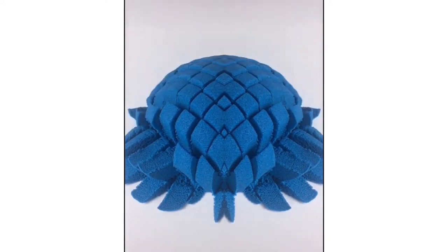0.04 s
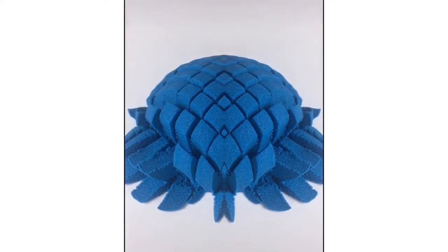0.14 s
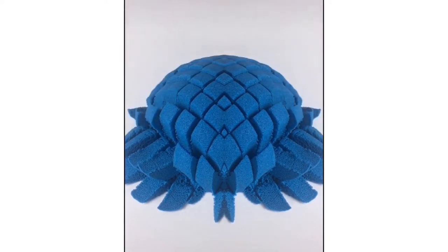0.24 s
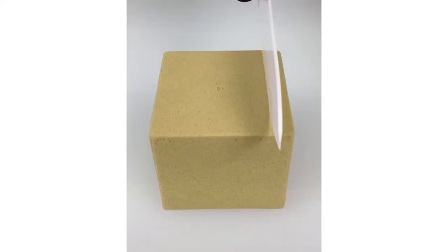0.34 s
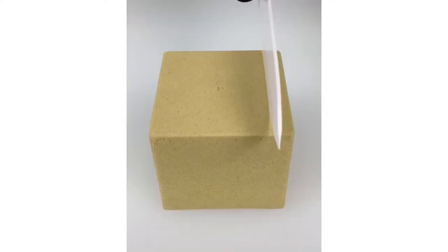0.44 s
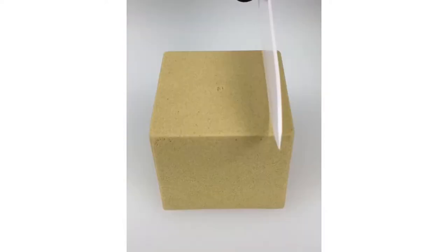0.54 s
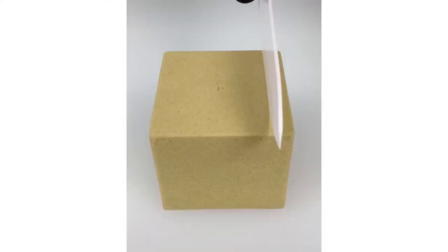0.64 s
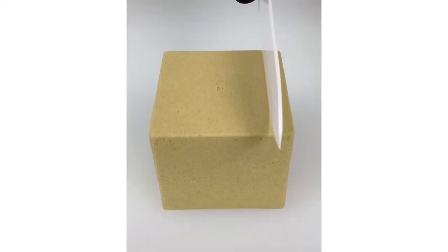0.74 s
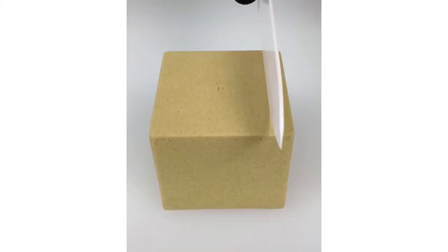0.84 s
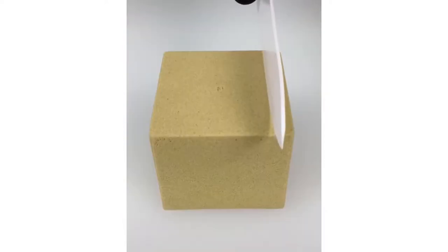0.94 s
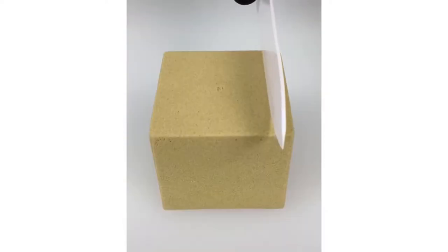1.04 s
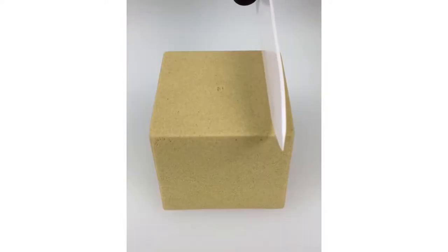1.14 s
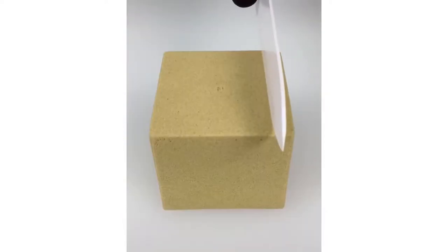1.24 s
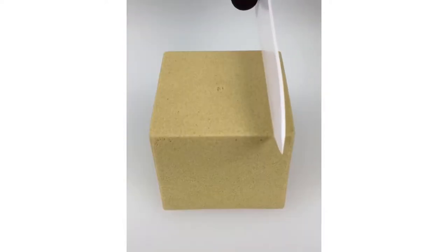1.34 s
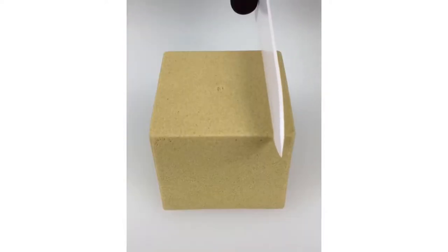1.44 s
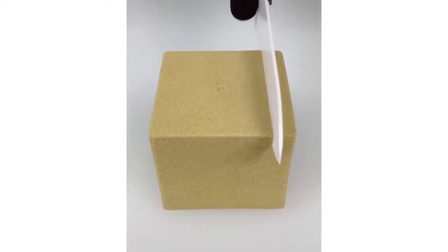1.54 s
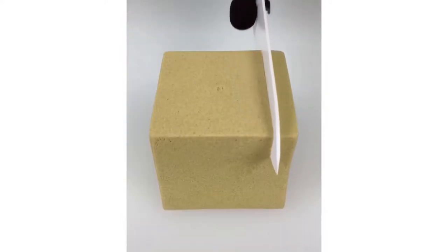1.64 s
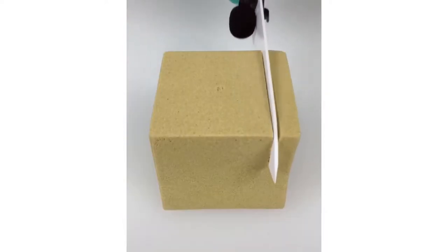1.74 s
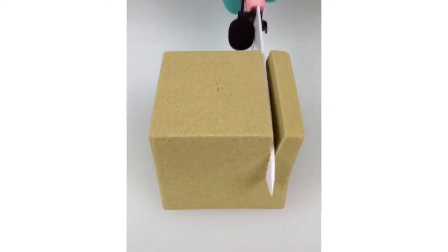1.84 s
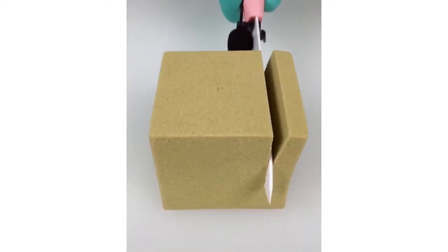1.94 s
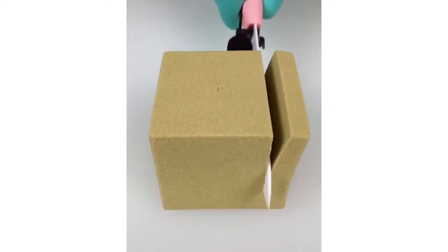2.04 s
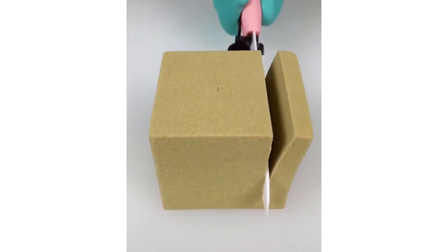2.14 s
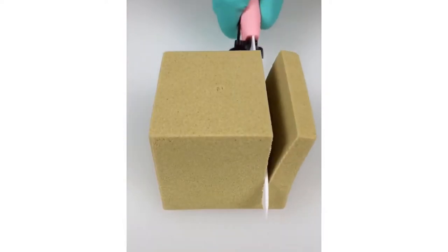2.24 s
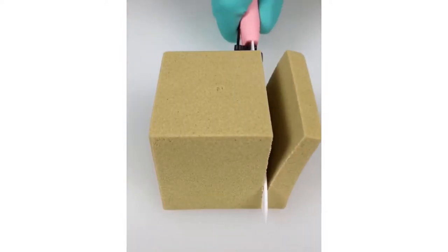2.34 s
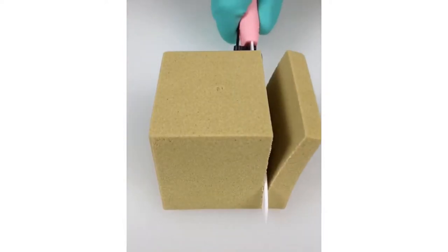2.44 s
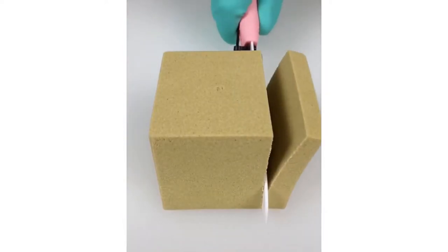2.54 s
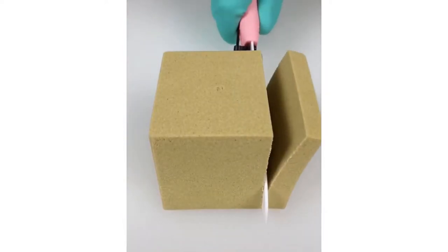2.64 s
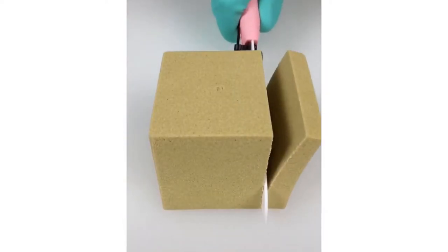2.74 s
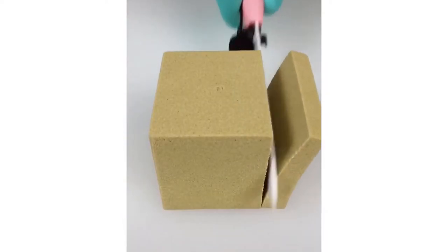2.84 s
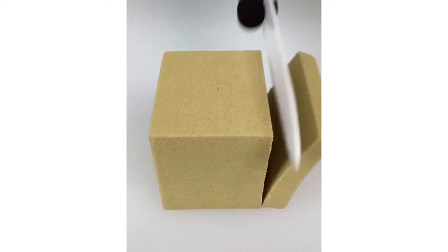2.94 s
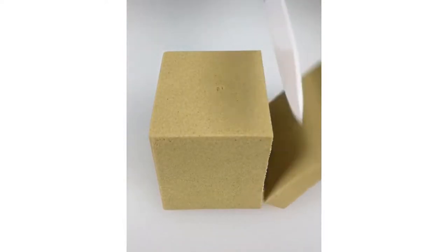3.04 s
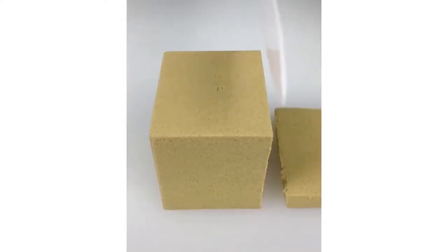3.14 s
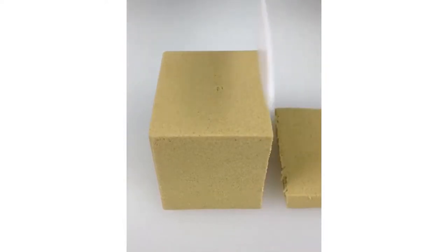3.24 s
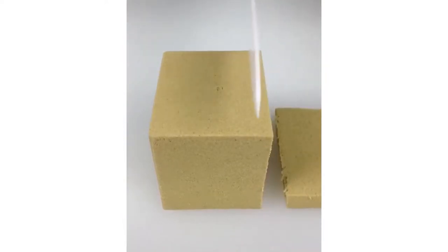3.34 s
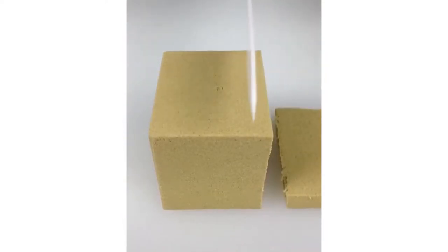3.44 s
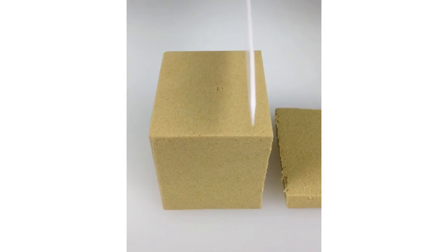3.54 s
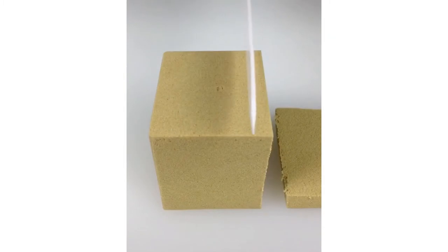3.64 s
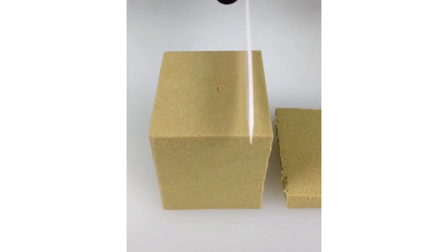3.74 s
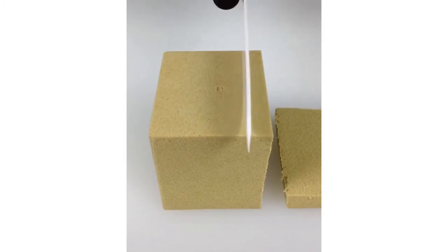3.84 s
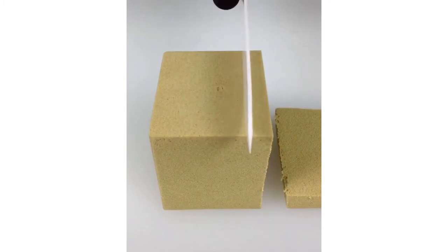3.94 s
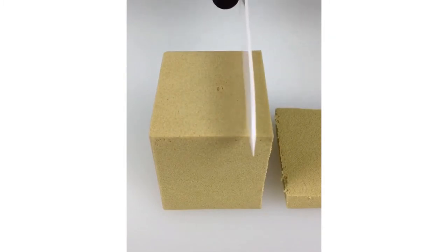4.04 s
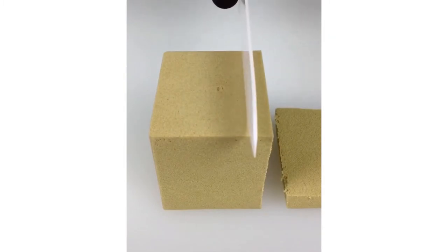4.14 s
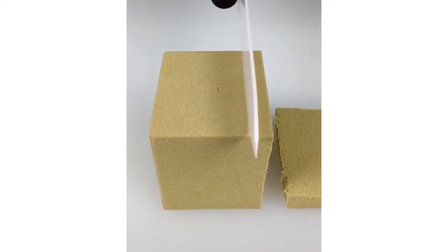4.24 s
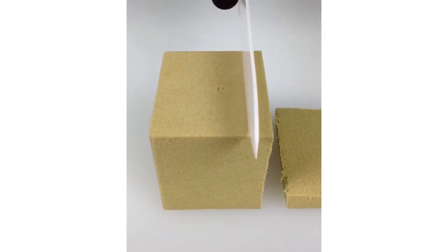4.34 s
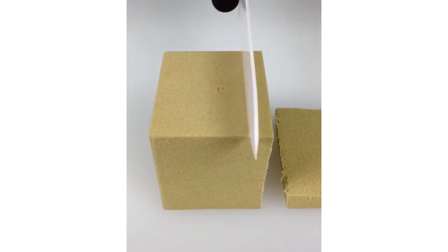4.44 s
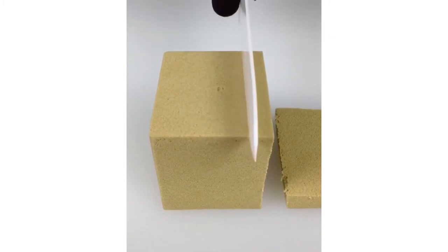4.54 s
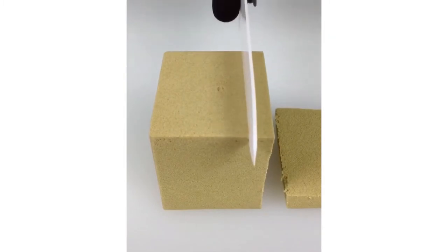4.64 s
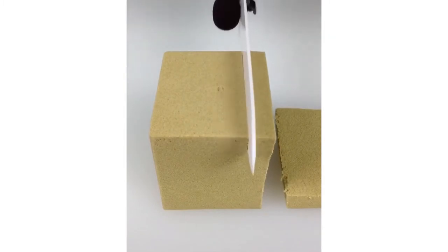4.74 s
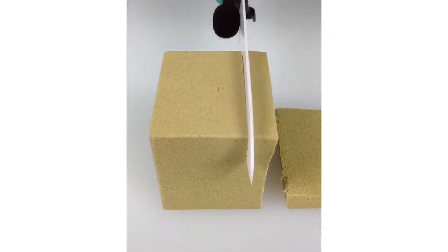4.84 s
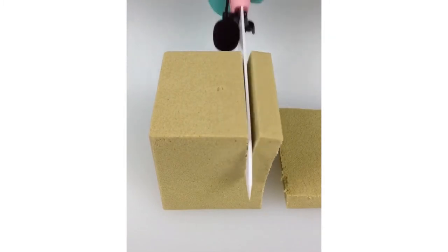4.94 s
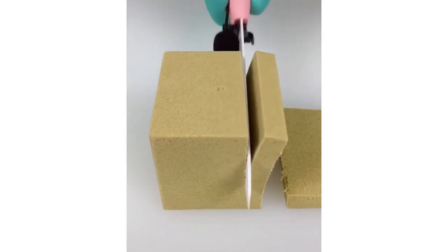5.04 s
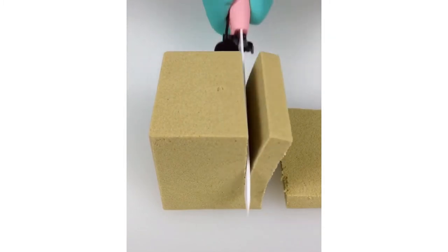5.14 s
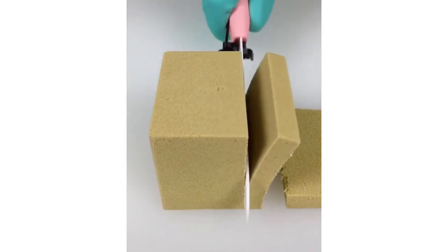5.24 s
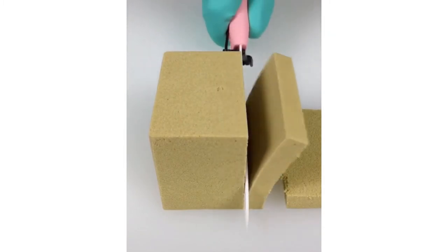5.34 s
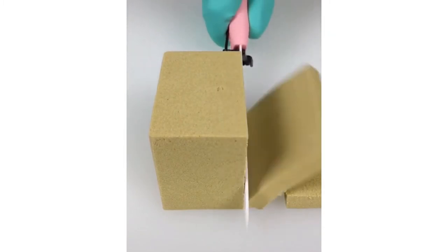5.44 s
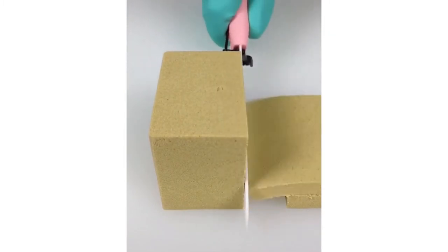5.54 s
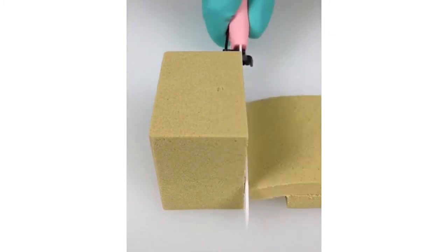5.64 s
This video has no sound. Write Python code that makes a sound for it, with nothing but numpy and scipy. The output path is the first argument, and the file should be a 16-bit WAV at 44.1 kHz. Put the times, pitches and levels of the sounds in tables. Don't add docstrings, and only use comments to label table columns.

```python
import sys
import numpy as np
from scipy import signal
from scipy.io import wavfile
from scipy.ndimage import uniform_filter1d

SR = 44100
rng = np.random.default_rng(int(sys.argv[2]) if len(sys.argv) > 2 else 0)


def amplitude_ratio(level_db):
    exponent = np.asarray(level_db, float) / 20
    return 10 ** exponent


def pcm_store(signal):
    levels = np.round(np.clip(np.atleast_2d(signal), -1, 1) * 32767)
    wavfile.write(sys.argv[1], SR, levels.astype(np.int16).T)


N = 250488

# f/Hz, level/dB per Hz
HISS_TONE = [(60, -9), (150, 2.5), (400, -0.5), (1000, -10), (4000, -14), (15400, -19)]
HISS_DB = -73.5
# f/Hz, level/dB per Hz
SWAY_TONE = [(3, 0), (20, 6.5), (40, -6), (80, -21), (140, -34.5), (300, -69)]
# t/s, level/dB
KICKS = [
    (.45, -55),
    (.97, -51),
    (2.4, -32.5),
    (2.86, -51.5),
    (3.24, -36),
    (3.95, -48),
    (4.7, -53),
    (5.43, -40),
    (5.68, -35),
]
SWAY_DB, SWAY_RISE, SWAY_FALL = -56.5, 220, 65

# t/s, peak level/dB
BITES = [(0.4277, -37.5), (0.4783, -33), (.5003, -44), (0.595, -45), (.634, -45.5), (.6699, -43),
         (0.7613, -34.5), (0.8646, -27), (.8764, -36), (0.9567, -33), (0.9714, -32), (3.923, -19.5),
         (3.937, -41), (3.9689, -41), (4.0322, -33), (4.0743, -38), (4.1144, -31.5), (4.145, -32),
         (4.2208, -33), (4.2697, -27.5), (4.2774, -25.5)]
# t/s, peak level/dB
CREAKS = [(0.7477, -33.5), (0.837, -31), (0.8759, -31), (0.899, -35), (0.92, -30.5), (0.9405, -29),
          (0.9585, -25), (0.974, -31), (0.986, -25), (1.0079, -27), (1.021, -23)]
# t/s, peak level/dB, relative dull level/dB, length/ms
REBOUNDS = [
    (2.3837, -3.5, -29, 1.8),
    (2.3862, -1, 0.5, 0.87),
    (2.3914, -3, -23, 0.37),
    (2.3935, -9, -33, 0.42),
    (2.397, -26, -23.5, 2.04),
    (5.43, 6, -8, 1.7),
    (5.4308, 9.5, -14.5, 0.44),
    (5.4387, 2.5, -10.5, 0.84),
    (5.4646, 1, -13, 0.91),
]
# t/s, peak level/dB, relative dull level/dB
PINCHES = [(2.4209, -22, -7), (2.4355, -25, -11.5), (2.4464, -50, -8), (2.4663, -26, -20.5),
           (2.4791, -7.5, -19), (2.4904, -40, -16), (2.5207, -14.5, -16), (2.5481, -18, 0),
           (2.5694, -45, -8), (2.5764, -36, -14), (2.616, -44.5, -16), (2.7493, -36, -7),
           (2.7754, -25.5, -20.5), (2.8055, -46.5, -20), (2.8619, -26, -12.5), (5.4599, -30, -15),
           (5.5443, -20, -24), (5.5645, -12, -11), (5.575, -26, 0), (5.6431, -53, -5), (5.656, -41, -30)]
LAG, RISE = .0009, .00015
GRAIN_MS, PINCH_MS = 1.7, 1
DULL_DB, DULL_SLOPE = -17, -0.16
# f/Hz, level/dB per Hz
CREAK_TONE = [(500, -20.5), (950, -4), (2300, -1.5), (4500, -4), (6500, -17), (10000, -31)]
# f/Hz, width/Hz, level/dB
CREAK_RING = [(1010, 650, 11), (2340, 450, 3.5), (4540, 400, 7)]

# t/s, length/s, level/dB, swell/dB, relative dull level/dB
SCRAPES = [(0.433, 0.027, -61, -17, 10), (.473, 0.081, -57.5, -4.5, 7), (2.398, .008, -33, -14, -8),
           (2.409, 0.16, -50.5, -7, -8), (2.583, 0.16, -76.5, 4, 0.5), (2.741, 0.07, -56.5, -7, 4),
           (2.807, 0.063, -67, 14.5, 3.5), (2.872, 0.05, -47, 7, 0.5), (3.927, 0.011, -41, -14, 4.5),
           (5.4415, 0.022, -29.5, -29, -2), (5.474, 0.095, -58, -1.5, 23), (5.636, 0.03, -58.5, 1, 8)]
# t/s, length/s, level/dB, swell/dB, relative dull level/dB
RUBS = [
    (.57, 0.091, -82.5, 18, 6.5),
    (.68, 0.11, -65, .1, -5),
    (3.96, 0.11, -56.5, 0.7, 0.5),
    (4.075, 0.036, -46.5, -1.5, -3.5),
    (4.12, 0.087, -51, -5.5, -5.5),
    (5.57, .04, -41.5, 3.5, -0.5),
]
SCRAPE_RISE, SCRAPE_FALL = 3500, 2400
# f/Hz, level/dB per Hz
FREE_BASE = [(1500, -30.5), (2700, -4), (6000, -2.5), (12000, -0.5), (15400, -5)]
# f/Hz, width/Hz, level/dB
FREE_MODES = [(3530, 35, 5.5), (4112, 180, 13.5), (5800, 100, 7), (6570, 90, 17), (6930, 190, 4.5),
              (7470, 75, 10.5), (9240, 620, 6.5), (10030, 110, 2.5), (10700, 350, 7.5), (11850, 640, 12),
              (14600, 370, 6)]
# f/Hz, width/Hz, level/dB
FREE_FLEX = [(1010, 200, 25), (1680, 70, 9), (1990, 80, 16), (2400, 200, 17)]
# f/Hz, level/dB per Hz
RUMBLE = [(35, -15), (70, -2), (120, 1.5), (200, -10.5), (350, -27.5), (600, -57.5)]
RUMBLE_BEND_DB, RUMBLE_RUB_DB = -8, -0.5

# t/s, level/dB
SLUMP = [(.655, -75), (.67, -45), (.682, -55), (.695, -40), (.725, -42.5), (.745, -44.5), (.76, -64)]
# f/Hz, level/dB per Hz
SLUMP_TONE = [(35, -22), (60, -3), (283, -14), (370, -13.5), (839, -17), (1000, -20), (1200, -27),
              (2180, -15.5), (12000, -39.5), (15600, -58), (22000, -120)]

# t/s, peak level/dB, first f/Hz, last f/Hz, first swing (out +, in -)
BUMPS = [
    (.6725, -24.5, 181, 110, 0.7),
    (.866, -43, 150, 90, 1),
    (2.861, -45, 300, 149, 0.66),
    (3.925, -20.5, 150, 91.6, 1),
]
LANDINGS = [
    (2.3871, 4.5, 400, 1205, 0.98),
]
TOPPLE = [
    (3.225, -4.5, 1090, 812, 0.83),
]
SLAMS = [
    (5.4322, 4.5, 640, 1340, -1.06),
]
FLOPS = [
    (5.6045, -19, 410, 90, 0.74),
]
# f/Hz, level/dB, t60/s
TABLE_MODES = [(362.3, -27.5, 0.12), (696, -17, 0.041), (1363, -12.5, 0.014), (1446, -26, 0.047),
               (1890, -15, 0.023), (2400, -35, .07)]
# f/Hz, level/dB
TABLE_ECHO = [(30, -5.5), (150, -9), (700, -6), (1350, -7.5), (2200, -11.5), (3100, -25), (4200, -23),
              (6500, -35.5), (12000, -44)]
# f/Hz, t60/s
ROOM_DECAY = [(60, 0.77), (120, 0.8), (300, 0.89), (1000, 0.61), (3000, 0.55), (8000, 0.34)]

# t/s, level/dB, half width/s
PUFFS = [
    (0.715, -26.5, 0.022),
    (2.397, -17, 0.0099),
    (2.904, -28.5, 0.068),
    (3.06, -53, 0.071),
    (3.33, -35.5, 0.044),
]

# t/s, grit level/dB
CUTS = [
    [(.77, -54.5), (1.2, -39), (1.55, -34.5), (1.686, -29), (1.75, -33.5), (1.86, -29), (2.17, -32),
     (2.33, -35.5), (2.369, -33)],
    [(4.2, -58.5), (4.32, -46), (4.47, -37), (4.86, -31.5), (5.034, -26.5), (5.104, -30.5), (5.236, -30),
     (5.37, -31), (5.415, -31)],
]
PLUNGE_S, PLUNGE_DB = .017, 10.5
CRUSH_TOP_DB, CRUSH_DEEP_DB, FLEX_DB = -11, -7, -8
# t/s, extra level/dB
LURCHES = [
    (.845, -3),
    (0.879, 8.5),
    (.93, -0.5),
    (0.971, 7.5),
    (1.186, 0.5),
    (1.22, -6),
    (1.242, 2),
    (4.284, -2),
    (4.316, 1.5),
    (4.887, -2.5),
]
LURCH_S = 0.01
# f/Hz, level/dB per Hz
GRIT = [(1590, -48.5), (2700, -13.5), (4090, -7.5), (5430, -8.5), (6710, -2.5), (10400, -4.5),
        (11800, -0.5), (15400, -11.5)]
# f/Hz, width/Hz, level over the grit/dB
BLADE = [(3283, 20, 6), (4234, 270, 7), (5515, 38, -3.5), (5870, 210, -5), (6626, 100, 8), (7560, 48, -3.5),
         (9500, 96, 1), (9700, 130, 4.5), (11380, 180, 3), (12760, 670, 2.5), (14300, 460, -6)]
# f/Hz, level/dB per Hz
FLEX_BASE = [(400, -30.5), (750, 3), (1300, -1.5), (2700, -2.5), (4000, -26)]
# f/Hz, width/Hz, level/dB
FLEX = [(1022, 160, 16), (1720, 450, 4.5), (1976, 100, 7), (2340, 180, 11.5)]
# f/Hz, level/dB per Hz
CRUSH = [(35, -30), (60, 0), (179, 4), (268, -1.5), (359, -1.5), (465, -5), (702, -4.5), (800, -3.5),
         (1040, -35.5), (1760, -120)]
CRUST_AT = [
    1,
    4.36,
]
CRUST_S, CRUST_PER_S, CRUST_DB = 0.2, 220, -37

# f/Hz, level/dB, t60/s
BOOM = [(30, -21.5, 0.19), (50.3, -33.5, 0.99), (109, -30, 0.67), (255, -22.5, 0.12), (357, -38, 0.27),
        (508, -37.5, 0.6)]
# f/Hz, level/dB
SLAB_ECHO = [(30, -8.5), (250, -7.5), (600, -4.5), (1500, -17), (3000, -28), (5500, -34.5), (8000, -42.5),
             (14000, -71)]
SLAB_DB = -4.5


def evened(x):
    return x / np.sqrt(np.mean(x ** 2) + 1e-20)


def read(points, hz):
    f, value = np.transpose(points)
    return np.interp(np.log(hz + 1), np.log(f + 1), value)


def add(mix, s, sound):
    part = mix[round(s * SR):][:len(sound)]
    part += sound[:len(part)]


def colour(x, points, peaks=(), size=8192):
    hz = abs(np.fft.fftfreq(size, 1 / SR))
    power = amplitude_ratio(read(points, hz)) ** 2
    for f, width, db in peaks:
        power = power * (1 + amplitude_ratio(db) ** 2 / (1 + (2 * (hz - f) / width) ** 2))
    log_gain = np.log(power + 1e-10) / 2
    phase = -signal.hilbert(log_gain).imag
    taps = np.fft.ifft(np.exp(log_gain + 1j * phase)).real[:size // 2]
    return signal.oaconvolve(x, taps / np.linalg.norm(taps))[:len(x)]


def level_curve(rows):
    s, db = np.transpose(rows)
    return np.interp(np.arange(N) / SR, s, db)


def window(rows, fade=.002):
    t = np.arange(N) / SR
    inside = np.minimum(t - rows[0][0], rows[-1][0] - t)
    return np.clip(inside / fade + 1, 0, 1)


def sway():
    t = np.arange(N) / SR
    kicks = [db + SWAY_RISE * np.minimum(t - s, 0) - SWAY_FALL * np.maximum(t - s, 0) for s, db in KICKS]
    return np.hypot(amplitude_ratio(SWAY_DB), amplitude_ratio(np.max(kicks, axis=0)))


def floor():
    hiss = amplitude_ratio(HISS_DB) * colour(rng.standard_normal(N), HISS_TONE)
    return hiss + sway() * colour(rng.standard_normal(N), SWAY_TONE, size=32768)


def ticks():
    bright, dull, t = np.zeros(N), np.zeros(N), np.arange(600) / SR
    rows = list(REBOUNDS)
    rows += [(s, db, DULL_DB + DULL_SLOPE * (db + 36), GRAIN_MS) for s, db in BITES]
    rows += [(*row, PINCH_MS) for row in PINCHES]
    rows += [(s, db - 12.5, 15, .3) for s, db in CREAKS]
    for s, db, dull_db, ms in rows:
        noise = rng.standard_normal(600)
        shape = np.exp(-1000 * t / max(ms, .1)) * np.minimum(t / RISE, 1)
        same_energy = np.linalg.norm(shape) / np.linalg.norm(shape * noise)
        burst = amplitude_ratio(db - 8.0) * shape * noise * same_energy
        add(bright, s + LAG, burst)
        add(dull, s + LAG, amplitude_ratio(dull_db + 6.5) * burst)
    return bright, dull


def stroke(levels, grains_per_s=14000, coarse_db=0.0, judder_db=0.5):
    hit = rng.random(N) < grains_per_s / SR
    grain_db = coarse_db * np.minimum(rng.exponential(1, N), 5)
    cracks = evened(hit * rng.standard_normal(N) * amplitude_ratio(grain_db))
    judder = amplitude_ratio(judder_db * evened(signal.lfilter([1], [1, -.995], rng.standard_normal(N))))
    crush = 0.55 * cracks + 0.89 * rng.standard_normal(N)
    return [judder * level * drive for level, drive in zip(levels, (cracks, crush, cracks))]


def scrapes():
    t, power = np.arange(N) / SR, np.zeros((3, N))
    for table, rub_db, bend_db in (SCRAPES, -17, -7), (RUBS, -6.5, -7):
        for s, length, db, swell_db, dull_db in table:
            edges = SCRAPE_RISE * np.minimum(t - s, 0) - SCRAPE_FALL * np.maximum(t - s - length, 0)
            swell = swell_db * np.clip((t - s) / length, 0, 1)
            shares = amplitude_ratio([[0], [dull_db + rub_db], [dull_db + bend_db]])
            power += (amplitude_ratio(db + swell + edges) * shares) ** 2
    return np.sqrt(power)


def slump(lumpy_db=4.0):
    lumps = evened(uniform_filter1d(rng.standard_normal(N), 150))
    level = window(SLUMP) * amplitude_ratio(level_curve(SLUMP) + 1.5 + lumpy_db * lumps)
    return colour(level * rng.standard_normal(N), SLUMP_TONE)


def knocks():
    dry, feed, t = np.zeros(N), np.zeros(N), np.arange(6000) / SR
    table = sum(amplitude_ratio(db - 60 * t / t60) * np.sin(2 * np.pi * hz * t) for hz, db, t60 in TABLE_MODES)
    edge = (1 - t / .00008) * np.exp(-t / .00008)
    push = amplitude_ratio(-14) * t / 0.0044 * np.exp(-t / 0.00069)
    # rows, t60 s, sharp edge dB, table ring dB, room dB
    kinds = [(LANDINGS, .017, -14, -6.5, -3), (SLAMS, 0.01, -18, .5, -2.5), (BUMPS, 0.037, -33, -34, -23),
             (FLOPS, 0.026, -38, -25, 1.6), (TOPPLE, 0.0087, -41.5, -6, -55)]
    for rows, t60, edge_db, ring_db, room_db in kinds:
        for s, db, first_hz, last_hz, sign in rows:
            hz = last_hz + (first_hz - last_hz) * np.exp(-t / 0.0025)
            blow = amplitude_ratio(-60 * t / t60) * np.sin(2 * np.pi * np.cumsum(hz) / SR)
            swing = sign * (blow + amplitude_ratio(ring_db) * table)
            add(dry, s, amplitude_ratio(db) * (swing + amplitude_ratio(edge_db) * edge + push))
            add(feed, s, amplitude_ratio([db + room_db]))
    return dry, colour(feed, TABLE_ECHO)


def room(x):
    taps = np.zeros(SR)
    at = np.arange(60, SR - 20, 10)
    taps[at + rng.integers(0, 10, len(at))] = rng.choice([-1., 1.], len(at))
    hz, t, z = signal.stft(taps, SR, nperseg=512)
    decay = amplitude_ratio(-60 * t / read(ROOM_DECAY, hz)[:, None])
    tail = signal.istft(z * decay, SR, nperseg=512)[1][:SR]
    return signal.fftconvolve(x, tail / np.linalg.norm(tail))[:N]


def puffs(leak_hz=1.6):
    t = np.arange(N) / SR
    bumps = sum(amplitude_ratio(db) * np.exp(-((t - s) / width) ** 2) for s, db, width in PUFFS)
    return signal.lfilter(*signal.butter(1, leak_hz, "high", fs=SR), bumps)


def cuts():
    t, level, depth = np.arange(N) / SR, np.zeros(N), np.zeros(N)
    for cut in CUTS:
        (s0, _), (s1, db1) = cut[0], cut[-1]
        rows = list(cut) + [(s1 + PLUNGE_S, db1 + PLUNGE_DB)]
        level += window(rows) * amplitude_ratio(level_curve(rows))
        depth += window(rows) * np.clip((t - s0) / (s1 - s0), 0, 1)
    level *= amplitude_ratio(sum(db * np.exp(-((t - s) / LURCH_S) ** 2) for s, db in LURCHES))
    crush_db = CRUSH_TOP_DB + (CRUSH_DEEP_DB - CRUSH_TOP_DB) * depth
    return level, level * amplitude_ratio(crush_db), level * amplitude_ratio(FLEX_DB)


def shifting(x, patchy_db=1.41):
    z = signal.stft(x, nperseg=512, noverlap=384)[2]
    patches = uniform_filter1d(rng.standard_normal(z.shape), size=5, axis=0)
    for _ in range(2):
        patches = uniform_filter1d(patches, size=40, axis=1)
    return signal.istft(z * amplitude_ratio(patchy_db * evened(patches)), nperseg=512, noverlap=384)[1][:N]


def crust():
    t = np.arange(N) / SR
    busy = sum(np.exp(-((t - s) / CRUST_S) ** 2) for s in CRUST_AT)
    splits = (rng.random(N) < CRUST_PER_S / SR) * rng.standard_normal(N)
    return amplitude_ratio(CRUST_DB) * busy * splits


def slab():
    feed, boom, t = np.zeros(N), np.zeros(N), np.arange(SR) / SR
    fall_s = TOPPLE[0][0]
    add(feed, fall_s, amplitude_ratio([SLAB_DB]))
    modes = sum(amplitude_ratio(db - 60 * t / t60) * -np.sin(2 * np.pi * hz * t) for hz, db, t60 in BOOM)
    add(boom, fall_s, modes * np.minimum(t / 0.034, 1))
    return boom, colour(feed, SLAB_ECHO)


def scene():
    bright, dull = ticks()
    scrape, rub, bend = stroke(scrapes(), coarse_db=1.6, judder_db=1.7)
    dry, echo = knocks()
    grit, crush, flex = stroke(cuts())
    boom, thud = slab()
    knife = shifting(colour(grit, GRIT, BLADE) + colour(flex, FLEX_BASE, FLEX))
    knife += colour(0.52 * bright, GRIT, BLADE)
    knife += colour(crush + rub, CRUSH)
    knife += colour(scrape + 0.72 * bright, FREE_BASE, FREE_MODES)
    knife += colour(bend, FLEX_BASE, FREE_FLEX)
    knife += colour(amplitude_ratio(RUMBLE_BEND_DB) * bend + amplitude_ratio(RUMBLE_RUB_DB) * rub, RUMBLE)
    knife += colour(dull, CREAK_TONE, CREAK_RING)
    mix = knife + dry + boom + slump() + puffs() + floor()
    mix += room(echo + thud + amplitude_ratio(-32.5) * knife)
    mix += colour(crust(), CREAK_TONE, CREAK_RING)
    return np.array([mix, mix])


def band_limit(x):
    return signal.sosfilt(signal.butter(12, 16490, fs=SR, output="sos"), x)


def record(dry):
    started = np.arange(N) >= .4255 * SR
    x = np.clip(dry, -.97, .97) * started
    lowpass = signal.firwin(511, 15550, window=("kaiser", 9), fs=SR)
    x = signal.oaconvolve(x, lowpass[None], "same")
    return band_limit(x)


dry = scene()
out = record(dry)
pcm_store(out)
```